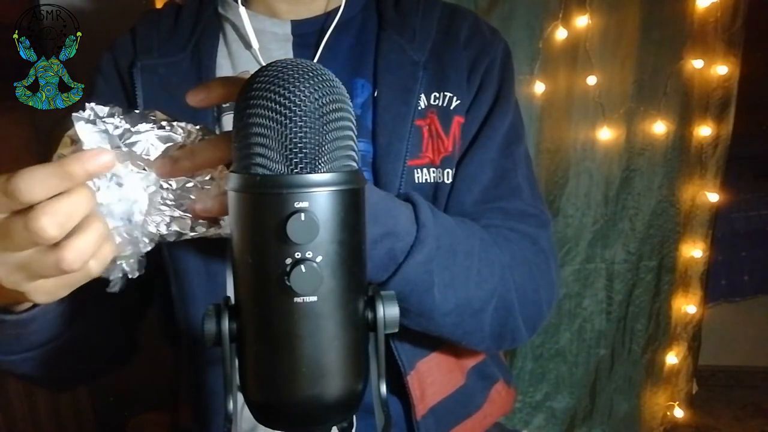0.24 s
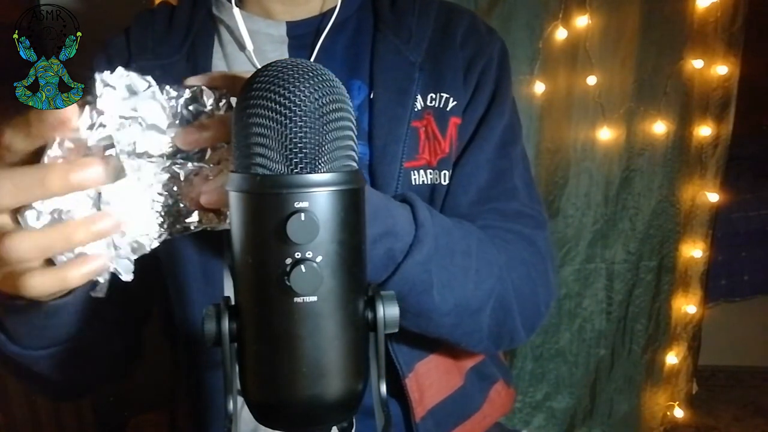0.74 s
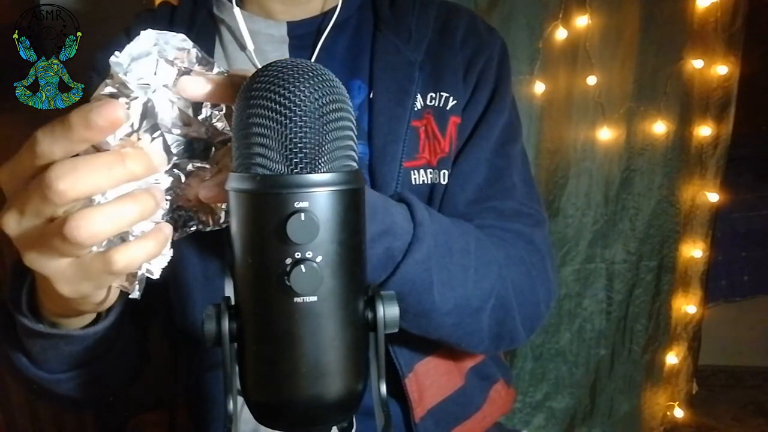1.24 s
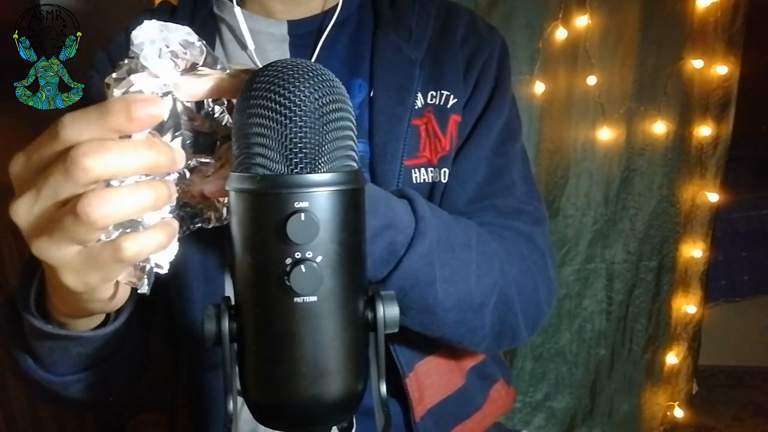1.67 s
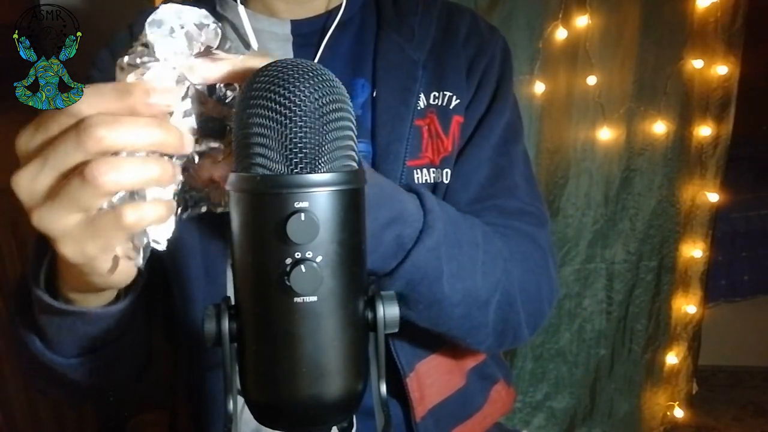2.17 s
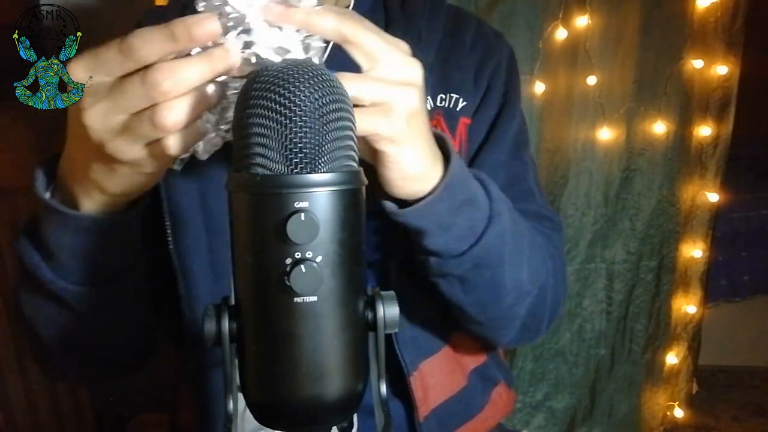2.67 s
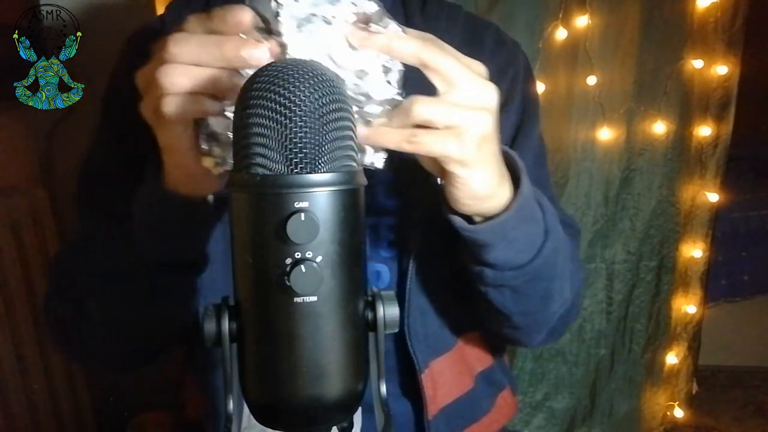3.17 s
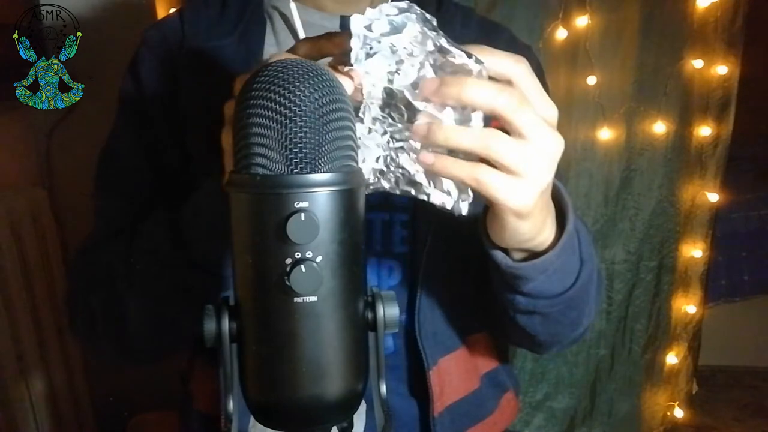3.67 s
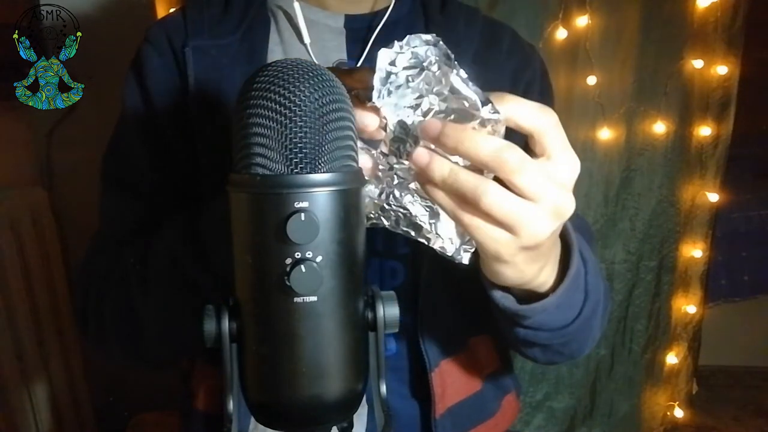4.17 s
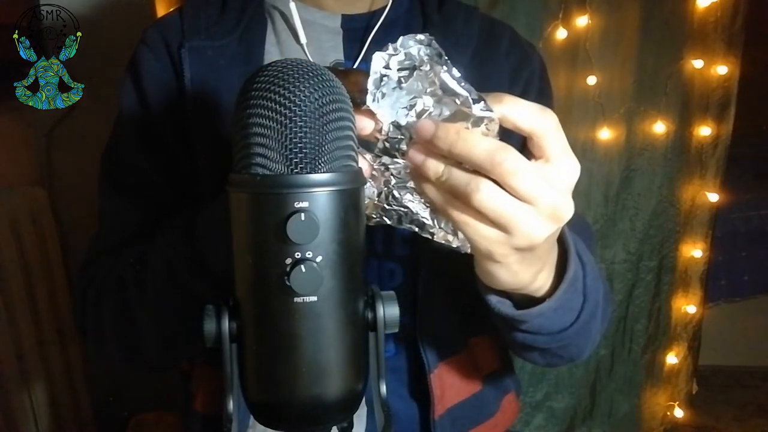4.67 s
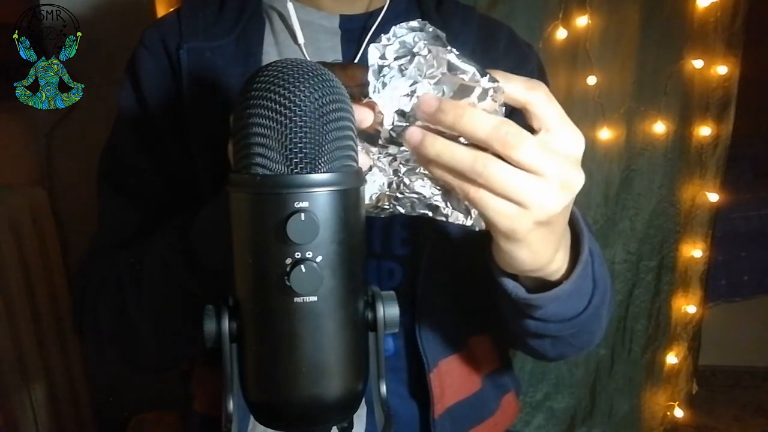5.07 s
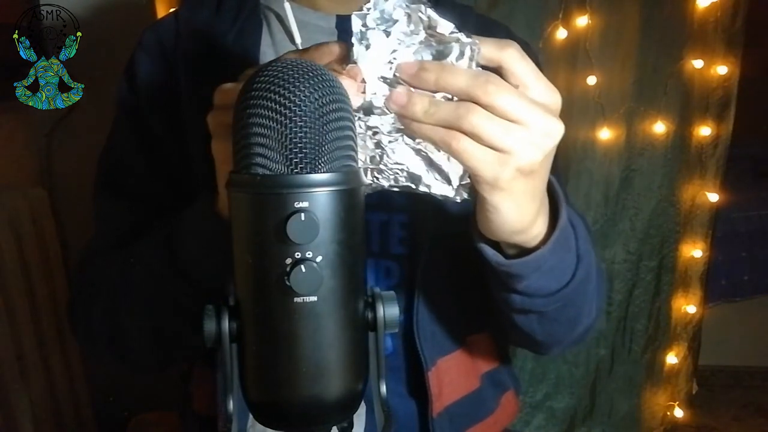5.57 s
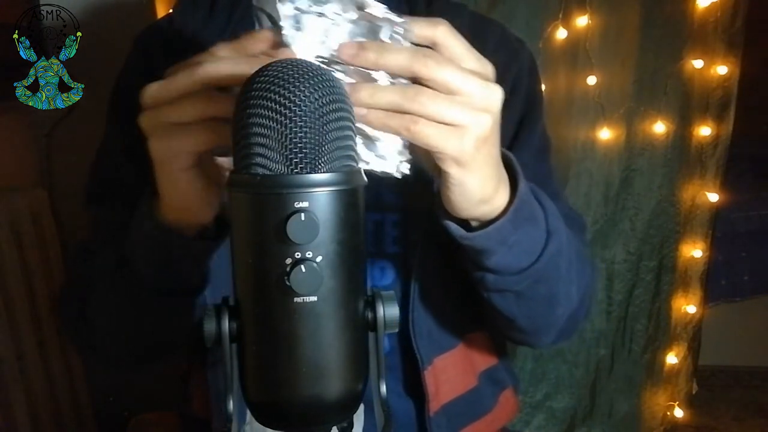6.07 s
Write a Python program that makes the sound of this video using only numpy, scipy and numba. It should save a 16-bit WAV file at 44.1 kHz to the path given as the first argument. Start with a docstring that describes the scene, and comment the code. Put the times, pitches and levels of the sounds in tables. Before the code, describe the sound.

Close, crisp crinkling of thin foil in irregular squeezes, busy at first, sparser and fainter around five seconds, then snapping again.

```python
"""Aluminium foil crumpled in both hands

Crumpled foil is squeezed beside a desk microphone in a quiet, damped room. Each crease that buckles ticks
and rings the small facets round it for a few milliseconds; countless faint creases crackle between the
loud ones. Large panels pop over with soft thuds, and the flexing sheet clicks dully and pushes low puffs
of air. A short hiss trails the snaps, over the faint noise of still air."""
import sys
import numpy as np
from scipy import signal
from scipy.fft import rfft, irfft, next_fast_len
from scipy.io import wavfile
from scipy.ndimage import uniform_filter1d
from numba import njit

SR = 44100
rng = np.random.default_rng(int(sys.argv[2]) if len(sys.argv) > 2 else 0)


def unload_audio(sound):
    """Save the sound as a 16-bit wav file, at the path given as the first command line argument."""
    columns = np.transpose(np.atleast_2d(sound))
    # keep every value between -1 and 1, then stretch to whole-number steps
    steps = np.round(np.clip(columns, -1, 1) * 32767)
    wavfile.write(sys.argv[1], SR, steps.astype(np.int16))


N = 279153


def undb(db):
    """Decibels to gain."""
    return 10 ** (np.asarray(db) / 20)


def level(x, db):
    """Scale to an rms level in dB."""
    return x * undb(db) / np.sqrt(np.mean(x ** 2))


def read(table, hz):
    """dB of a spectrum, straight lines on a log-frequency axis."""
    f, db = np.transpose(table)
    return np.interp(np.log(hz), np.log(f), db)


def noise(table):
    """Noise with the given spectrum, rms 1."""
    size = next_fast_len(N)
    hz = np.maximum(np.arange(size // 2 + 1) * SR / size, 1)
    spectrum = rfft(rng.standard_normal(size)) * undb(read(table, hz))
    return level(irfft(spectrum, size)[:N], 0)


def walk(rate):
    """Random levels, `rate` of them a second, joined by straight slopes."""
    k = int(SR / rate)
    held = np.repeat(rng.standard_normal(N // k + 1), k)
    return uniform_filter1d(held, k)[:N]


@njit
def add(out, start, pole, size, rise):
    """Damped rings, each swelling over a short rise and followed until it is 60 dB down."""
    for k in range(len(start)):
        z, gate = size[k], 1.
        length = int(-6.9 / np.log(abs(pole[k])))
        for i in range(start[k], min(start[k] + length, len(out))):
            gate *= rise[k]
            out[i] += z.imag * (1 - gate)
            z *= pole[k]


def rings(s, hz, t60, gain, rise_s):
    """Sum of decaying sine rings that start at times s with random phase."""
    s, hz, t60, gain, rise_s = (np.ravel(v) for v in np.broadcast_arrays(s, hz, t60, gain, rise_s))
    out = np.zeros(N)
    turn = 2j * np.pi * np.clip(hz, 20, .45 * SR)
    decay = np.log(1000) / np.clip(t60, 1e-3, 1)
    pole = np.exp((turn - decay) / SR)
    size = gain * np.exp(2j * np.pi * rng.random(len(s)))
    start = np.clip(s * SR, 0, N - 1).astype(np.int64)
    add(out, start, pole, size, np.exp(-1 / (rise_s * SR)))
    return out


def facets(s, db, focus_hz, lo_hz, hi_hz, count, spread_s, bend=1.):
    """A buckling crease rings `count` facets over a band; those near its own size most, late ones less."""
    # how readily the foil's facets ring: (f/Hz, level/dB)
    foil_response = [(130, -33), (220, -4.5), (990, -3.5), (1460, -1.5), (2500, -3), (5400, -3),
                     (9240, 0.5), (13900, 0), (17000, -2)]
    ring_s, ring_power = 0.0055, 0.31  # mean t60 of a 4 kHz facet; larger facets ring longer
    focus_db = 7.0  # fall per octave away from the size of the crease, down to a floor
    u = rng.random((len(s), count, 4))
    place = (np.arange(count) + u[..., 0]) / count
    hz = lo_hz + (hi_hz - lo_hz) * place ** bend
    late = -np.log(1 - u[..., 1])
    t60 = ring_s * (4000 / hz) ** ring_power * (.5 + u[..., 2])
    off_db = np.minimum(focus_db * np.abs(np.log2(hz / focus_hz[:, None])), 8.5)
    scatter_db = 6.8 * (u[..., 3] - .5)
    db = db[:, None] + read(foil_response, hz) - off_db - 3.54 * late + scatter_db
    return rings(s[:, None] + spread_s * late, hz, t60, undb(db) / np.sqrt(count), .0001)


def snaps():
    """Loud creases: a dry tick, then one facet stands out and its neighbours ring with it."""
    # buckling creases: (t/s, main facet level/dB, small facets level/dB, large facets level/dB,
    # main facet f/Hz); levels relative within each column
    creases = [(0.0164, -24, -27, -34, 2100), (0.0352, -17, -26, -39, 7000), (0.064, -14, -10, -9.5, 2530),
               (0.203, -20, -26, -31, 6960), (0.2485, -27, -29, -36, 1260), (0.251, -16, -30, -29, 4560),
               (0.2683, -18.5, -27, -44, 4500), (0.401, -19, -22, -22.5, 7600),
               (0.529, -36, -31, -20.5, 2620), (0.5855, -18, -28, -45, 12800),
               (0.6013, -12.5, -21, -45, 2830), (0.6562, -1, -18, -28, 12100),
               (0.6827, -12, -23, -28, 9040), (0.7236, -12, -14, -21, 7900), (0.752, -7, -25, -31, 11500),
               (0.7626, -5, -23, -30, 9200), (0.771, -3, -28, -34, 3120), (0.783, -7, -29, -42, 3000),
               (0.7964, -6.5, -31, -40, 2640), (0.8064, -20, -10, -36, 6330), (0.823, -10, -24, -27, 1700),
               (0.8564, -7.5, -36, -38, 2420), (0.8962, -21, -17, -25, 5000), (0.923, -2.5, -17, -25, 4570),
               (0.946, -11, -13.5, -31, 9200), (0.9516, -6, -16, -19, 2900), (0.9725, -9, -14, -45, 9130),
               (0.999, -20, -19, -36, 3500), (1.0273, -28, -21, -30, 890), (1.058, -21, -16, -26.5, 9700),
               (1.0785, -16, -25, -25.5, 2460), (1.1135, -14.5, -21, -21, 1080),
               (1.133, -21, -20, -31, 2780), (1.1744, -11, -16, -51, 3450), (1.189, -5, -11, -31, 9900),
               (1.246, -10, -38, -39, 3300), (1.251, -11, -22, -24, 8200), (1.2716, -8, -23, -39, 13820),
               (1.303, -6, -22, -27, 9500), (1.3637, -13, -10, -30, 10100), (1.392, -8, -16, -30, 9500),
               (1.408, -10, -13, -59, 2700), (1.4507, -8, -24, -42, 9000), (1.4774, -12, -10, -25.5, 10550),
               (1.546, -7, -13, -24, 9220), (1.5551, -13, -21, -46, 10290), (1.577, -9, -14, -25, 3370),
               (1.6014, -9.5, -13, -28, 2930), (1.635, -14, -12.5, -43, 7200),
               (1.6735, -12, -12, -28, 7600), (1.69, -8, -20, -32.5, 11300), (1.7125, -6, -19, -25, 10900),
               (1.7277, -10, -10.5, -40, 3240), (1.809, -9, -14.5, -25, 10700),
               (1.8504, 2, -8.5, -47, 14300), (1.861, -6.5, -22, -36, 6440),
               (1.8796, -16, -20, -30.5, 11000), (1.934, -24, -28, -50, 11200),
               (1.9762, -10, -10.5, -23.5, 8930), (2.008, -11, -21, -54, 6600),
               (2.053, -17, -32, -38, 5500), (2.0558, -16, -30, -29, 2540), (2.0765, -22, -40, -26, 1500),
               (2.093, -25, -32, -23, 1970), (2.0976, -10, -17, -23, 14000), (2.102, -21, -19, -23, 5000),
               (2.115, -20, -22, -28, 10500), (2.133, -5, -17, -25, 11900), (2.1494, -22, -15, -17, 3340),
               (2.1992, -12, -20, -19, 2800), (2.206, -8, -8.5, -11.5, 4960), (2.2213, -18, -20, -16, 2000),
               (2.2357, -9, -12.5, -41, 4060), (2.2625, -25, -19, -39, 6000), (2.2758, -26, -29, -29, 3000),
               (2.2999, -25, -41, -23.5, 3660), (2.3334, -15, -30, -29, 4000), (2.338, -15, -20, -17, 8550),
               (2.356, -6.5, -8.5, -15.5, 3600), (2.3896, 2, -6, -33, 3640), (2.434, -8, -40, -50, 11000),
               (2.483, -14, -23, -15, 2450), (2.5042, -30, -34, -33, 2550), (2.5485, -12, -19, -46, 7300),
               (2.552, -15, -14.5, -25, 1480), (2.5722, -8, -20, -22, 7900), (2.5862, -8, -29, -19, 2280),
               (2.6256, -17, -32, -32, 7050), (2.6412, -4.5, -6.5, -20, 1890), (2.661, -23, -17, -28, 9500),
               (2.699, -13, -20, -40, 2490), (2.7053, -19, -18, -33, 9300), (2.7275, -13, -20, -27, 9650),
               (2.735, -15, -16, -33, 8200), (2.748, -23, -9.5, -22, 8140), (2.7976, -3, -16, -33, 11600),
               (2.832, -17, -12, -27, 10000), (2.8476, -9, -13, -27, 7660), (2.8578, -12, -13, -28, 13050),
               (2.9185, -13, -22, -44, 9100), (2.928, -12, -10, -23, 9100), (2.9428, -10, -9, -14, 6900),
               (2.959, -18, -22, -26, 5990), (3.0333, -24, -18.5, -34, 7000), (3.0997, -13, -19, -36, 2270),
               (3.12, -9, -14, -26, 10550), (3.128, -10, -24, -32, 5540), (3.142, -11, -32, -30, 5200),
               (3.196, -10, -22, -26, 7550), (3.205, -4.5, -11, -33, 9300), (3.212, -7, -22, -36, 9600),
               (3.24, -20, -24, -34, 8000), (3.3197, -17, -41, -47, 8140), (3.3514, -22, -20, -33, 10680),
               (3.3792, -31, -32, -30, 1300), (3.403, -14, -27, -45, 11700),
               (3.4165, -30, -15.5, -22.5, 1100), (3.475, -15, -18, -42, 7000),
               (3.4823, -24, -41, -21, 1190), (3.515, -19, -25, -35, 9500), (3.5453, -10, -26, -44, 9950),
               (3.592, -21, -19, -19.5, 1510), (3.6385, -19, -17.5, -33.5, 6760),
               (3.69, -3.5, -17, -23, 9150), (3.726, -18, -12, -19.5, 9000), (3.737, -10, -23, -28, 8100),
               (3.7698, -12, -20, -26.5, 8900), (3.7972, 1, -3, -23.5, 8830), (3.8415, -15, -18, -29, 7200),
               (3.8568, -4, -15, -37, 9050), (3.9841, -29, -25, -20.5, 2650), (4.034, -12, -22, -40, 9170),
               (4.075, -5, -16, -28.5, 14400), (4.1155, -11, -14.5, -22.5, 8900),
               (4.1512, -9, -36, -22, 8300), (4.1987, -12, -25, -20.5, 9700), (4.247, -13, -22, -31, 9170),
               (4.319, -32, -29.5, -43, 9600), (4.466, -18, -22, -38, 3100), (4.4732, -33, -22, -34, 11700),
               (4.5096, -19, -21, -28, 1420), (4.5402, -12, -17.5, -39, 10800),
               (4.558, -30, -30, -47, 7000), (4.5673, -18, -18, -29, 2050), (4.5895, -29, -36, -41, 2500),
               (4.605, -27, -24, -34, 1800), (4.643, -37, -33, -31.5, 5000), (4.6698, -29, -37, -38, 2200),
               (4.7175, -27, -51, -57, 8910), (4.8393, -22, -35, -40, 9050), (4.86, -30, -40, -40, 3500),
               (4.948, -19, -36, -42, 9400), (4.9772, -21, -28, -28.5, 8440), (5.086, -22, -39, -60, 10200),
               (5.111, -28, -27.5, -53, 12500), (5.127, -30, -35, -46, 13100),
               (5.1523, -27, -36, -58, 10500), (5.176, -8, -16, -44, 5860), (5.256, -26, -30, -44, 11180),
               (5.306, -22, -30, -50, 9750), (5.3558, -19, -29, -44, 10720),
               (5.3702, -11, -10, -25.5, 8700), (5.42, -7, -24, -30, 6460), (5.425, -7, -16, -44, 9200),
               (5.4333, -18, -6, -32, 12600), (5.443, -7, -23, -48, 8500), (5.551, -12, -22, -52, 9260),
               (5.5724, -14.5, -16, -29, 2600), (5.595, -13, -16, -31, 8200), (5.611, -14, -20, -40, 8100),
               (5.644, -32, -15, -30.5, 12000), (5.7415, -27, -58, -45, 1420),
               (5.757, -18.5, -28, -35, 7550), (5.7717, -28, -20.5, -35, 12800),
               (5.7945, -16, -29, -25, 1230), (5.8083, -29, -24, -41, 3000), (5.833, -10, -19, -46, 9100),
               (5.843, -27, -13.5, -30, 6500), (5.855, -19, -35, -29, 2200),
               (5.9018, -17, -19, -23.5, 9400), (5.9502, -22, -30, -37, 2950),
               (5.9746, -11, -21.5, -25.5, 7060), (6.0159, -20, -29, -28.5, 8100),
               (6.039, -20, -31, -34, 9870), (6.0764, -26, -33, -49, 6370), (6.0917, -24, -17.5, -30, 6860),
               (6.0944, -19, -20, -32, 4500), (6.102, -20, -27, -32, 4020), (6.2053, -5, -17, -24.5, 12000),
               (6.2158, -16, -22, -33, 7540), (6.2879, -2, -9, -19, 7300), (6.2961, -11, -13.5, -23, 11760),
               (6.3072, -21, -36, -36, 8200)]
    snap_s, snap_power, tick_hz = 0.0036, 0.12, 3450  # t60 of a 4 kHz main facet, its slope with size
    s, main_db, small_db, large_db, hz = np.transpose(creases)
    main = rings(s + .0002, hz, snap_s * (4000 / hz) ** snap_power, undb(main_db), 0.000085)
    tick = rings(s, tick_hz, 0.00093, undb((small_db + large_db) / 2 + 11.0), .00003)
    large = facets(s, large_db + 14.0, np.minimum(hz, 2800), 215, 4120,
                   count=12, spread_s=.0003, bend=1.303)
    small = facets(s, small_db + 12.0, np.maximum(hz, 6000), 4220, 17150, count=22, spread_s=0.00035)
    return tick + main + large + small


def squeeze_db(t):
    """Crackle strength of small and large facets: every squeeze grips, holds, lets go and settles."""
    # squeezes of the fingers: (t/s, length/s, level at start/dB, level at end/dB,
    # large facets over small ones level/dB)
    squeezes = [(0, 0.067, -35, -43, 4.5), (0.079, 0.045, -37, -32.5, 2.5), (0.155, 0.053, -40, -38, -0.5),
                (0.242, 0.044, -34.5, -37, -0.5), (0.318, 0.13, -35.5, -35, 2.5),
                (0.475, 0.056, -38, -32.5, 1), (0.573, 0.059, -36.5, -39.5, -7),
                (0.656, .035, -38, -34, -0.5), (0.707, 0.13, -28.5, -31, 1), (0.853, 0.034, -34, -34, -2.5),
                (0.923, 0.09, -25.5, -39.5, -0.5), (1.054, 0.11, -37.5, -35, -0.5),
                (1.183, 0.15, -31.5, -30, -0.5), (1.345, 0.049, -46, -35, 2.5),
                (1.438, 0.18, -35.5, -31.5, -1), (1.659, 0.19, -38, -33.5, -2.5),
                (1.973, 0.062, -44, -44.5, -8), (2.047, 0.19, -40.5, -38, 4.5),
                (2.307, 0.11, -37, -36.5, 1), (2.461, 0.29, -36, -34.5, -0.5),
                (2.781, 0.16, -33, -32.5, -3), (2.996, 0.033, -49, -42, 0.5),
                (3.079, 0.13, -33.5, -34.5, -3.5), (3.257, 0.014, -35, -45.5, -5.5),
                (3.321, 0.348, -38.5, -43.5, -4.5), (3.705, 0.19, -37, -31.5, -4),
                (3.934, 0.29, -35, -35.5, -3), (4.457, 0.2, -48, -45, -0.5), (4.81, 0.16, -55, -55, 4.5),
                (5.061, 0.2, -67, -45, -2), (5.332, 0.051, -42, -46, -4), (5.42, 0.21, -30.5, -40.5, -6.5),
                (5.776, 0.13, -43.5, -42, -3), (5.89, 0.22, -54, -42, -2), (6.166, 0.026, -46, -41, -5),
                (6.31, 0.013, -47, -50, -4)]
    grip_s, let_go_s = 0.013, 0.028  # e-fold times of the rise before and the fall after the hold
    settle_db, settle_s = -9.5, 0.029  # fainter crackle under the hold, and its e-fold time once let go
    creep_db = -56.5  # the foil still settles between squeezes
    power = undb(2 * creep_db) + np.zeros((2, len(t)))
    for s, length, first_db, last_db, large_db in squeezes:
        left = s + length - t
        held_db = np.interp(t, [s, s + length], [first_db, last_db])
        edge = np.minimum(np.minimum((t - s) / grip_s, left / let_go_s), 0)
        settle = undb(2 * settle_db) * (t > s) * np.exp(2 * np.minimum(left / settle_s, 0))
        small = undb(2 * held_db) * (np.exp(2 * edge) + settle)
        power = power + small * np.array([[1], [undb(2 * large_db)]])
    return 10 * np.log10(power)


def crackle(lo_hz, hi_hz, per_s, scatter_db, count):
    """Random faint creases, each of its own size and with a long-tailed spread of strengths, rms 1."""
    u = rng.random((int(per_s * N / SR), 3))
    db = np.minimum(-scatter_db * np.log(1 - u[:, 1]), 14.)
    # the fold under the fingers sets the size for a while
    fold = .5 + .3 * walk(9)[(u[:, 0] * N).astype(int)]
    size = np.clip(.6 * fold + .4 * u[:, 2], 0, 1)
    focus_hz = lo_hz * (hi_hz / lo_hz) ** size
    return level(facets(u[:, 0] * N / SR, db, focus_hz, lo_hz, hi_hz, count=count, spread_s=.0002), 0)


def small_crackle(small_db, burst_db):
    """Small creases tick while crumpled layers scrape; a light grip ticks, a firm one scrapes."""
    ticks = crackle(2310, 17000, 500., 8.7, count=12)
    rustle = crackle(3310, 17230, 5200., 3.7, count=3)
    scrape_db = -5.5 + 0.28 * (small_db + 36)
    return undb(small_db + burst_db) * (undb(-0.5) * ticks + undb(scrape_db) * rustle)


def large_crackle(large_db, burst_db):
    """Larger facets buckle lower in pitch and follow the avalanches less."""
    return undb(large_db + 0.51 * burst_db - 4.5) * crackle(1120, 4110, 850., 4.5, count=4)


def pops():
    """Large panels flip with a soft thud of a few quickly dying cycles, in three partials."""
    # panels popping over: (t/s, level/dB, f/Hz)
    panel_pops = [(0.064, -24, 300), (0.528, -28.5, 142), (0.89, -26.5, 258), (1.112, -25, 517),
                  (2.107, -24.5, 187), (2.133, -20, 550), (2.152, -22, 503), (2.181, -31, 186),
                  (2.207, -23, 536), (2.229, -29.5, 120), (2.248, -30, 431), (2.301, -21, 443),
                  (2.317, -24, 814), (2.341, -20.5, 427), (2.365, -29, 123), (2.377, -27, 500),
                  (2.392, -15.5, 596), (2.396, -21, 114), (2.414, -41, 151), (2.637, -29, 406),
                  (2.848, -34, 264), (2.904, -30, 170), (2.949, -21, 158), (3.094, -27.5, 362),
                  (3.199, -32, 221), (3.241, -21.5, 186), (3.259, -29, 400), (3.414, -26, 183),
                  (3.593, -38, 201), (3.856, -27.5, 258), (3.893, -20, 383), (4.248, -31, 375),
                  (4.475, -30.5, 234), (4.516, -31, 70), (4.569, -31, 180), (4.606, -24, 454),
                  (4.609, -22.5, 120), (4.618, -32, 65), (4.646, -27, 167), (4.657, -36, 60),
                  (4.69, -32, 130), (4.745, -35, 150), (4.823, -30.5, 330), (4.831, -35, 161),
                  (4.972, -35, 114), (5.795, -30, 695), (5.815, -38, 42), (5.869, -29, 163),
                  (5.953, -38, 52.4), (6.02, -28.5, 360), (6.039, -34, 181), (6.095, -35, 70),
                  (6.161, -30.5, 228)]
    s, db, hz = np.transpose(panel_pops)
    hz = hz[:, None] * np.array([.62, 1, 1.7])
    s = s[:, None] - .0018  # starts early, as the thud swells to its peak
    return rings(s, hz, 6.3 / hz, undb(db[:, None] + np.array([-5.0, 2.5, -3.0])), 0.4 / hz)


def bending_db(t, small_db, burst_db):
    """Strength of the sheet's bending: a slow course, raised by the grip and jolted in bumps."""
    # slow course of the flexing sheet: (t/s, level/dB)
    fold_course = [(0.0, -49), (0.32, -57), (0.6, -52), (1.69, -62.5), (1.87, -70), (2.06, -52),
                   (2.24, -49.5), (2.57, -54.5), (2.73, -44), (4.05, -51), (4.27, -55.5), (4.49, -57.5),
                   (4.71, -49.5), (5.04, -56), (5.24, -54.5), (5.38, -65), (5.82, -52.5), (6.03, -49),
                   (6.22, -49.5), (6.33, -51)]
    slack_db = np.interp(t, *np.transpose(fold_course))
    grip_db = small_db - uniform_filter1d(small_db, SR // 2)
    flex_db = slack_db + 0.65 * grip_db + 4.5
    return flex_db + .6 * burst_db + 3.0 * walk(16)


def panel_clicks(bump_db, large_db):
    """Whole panels click dully when the sheet flexes."""
    return undb((bump_db + large_db) / 2 - 8.0) * crackle(217, 1210, 250., 5.3, count=3)


def air_puffs(bump_db):
    """The flexing sheet pushes low air noise in bumps."""
    # spectrum of the pushed air: (f/Hz, level/dB per Hz), relative
    flex_spectrum = [(12, -27), (20, 8.5), (163, 5), (304, -3), (358, -0.5), (700, -14.5), (910, -60)]
    return undb(bump_db - 5.0) * noise(flex_spectrum)


def after_rattle(x):
    """The shaken sheet and soft room sound on as a fading hiss that keeps the colour of each snap."""
    # bands of the tail: (low edge f/Hz, high edge f/Hz, t60/s, level/dB)
    rattle_bands = [(497, 2760, 0.047, -8.5), (1960, 4630, 0.025, -5), (4940, 12200, 0.027, -5.5),
                    (9600, 19600, 0.007, -8)]
    out = 0
    for lo_hz, hi_hz, t60, db in rattle_bands:
        edges = np.geomspace(lo_hz, min(hi_hz, .45 * SR), 3)  # two strips to a band
        keep = 1e-6 ** (1 / (t60 * SR))  # energy kept per sample
        for strip in zip(edges, edges[1:]):
            band = signal.butter(2, strip, "bandpass", fs=SR, output="sos")
            stored = signal.lfilter([1 - keep], [1, -keep], signal.sosfilt(band, x) ** 2)
            hiss = level(signal.sosfilt(band, rng.standard_normal(N)), 0)
            out = out + undb(db) * np.sqrt(stored) * hiss
    return out


def still_air():
    """Steady faint noise of the quiet room."""
    # spectrum of the background: (f/Hz, level/dB per Hz), relative
    air_spectrum = [(15, -30), (25, 0), (1330, -5), (6210, -7), (9320, -6), (16000, -15)]
    return undb(-66) * noise(air_spectrum)


def scene():
    """Snaps, crackle, pops and flexing, their tail, and still air."""
    t = np.arange(N) / SR
    small_db, large_db = squeeze_db(t)
    burst_db = 1.92 * walk(45)  # creases give way in avalanches
    bump_db = bending_db(t, small_db, burst_db)
    foil = snaps() + small_crackle(small_db, burst_db) + large_crackle(large_db, burst_db)
    foil = foil + pops() + panel_clicks(bump_db, large_db)
    return (foil + after_rattle(foil) + air_puffs(bump_db) + still_air())[None]


def record(dry):
    """Rounds the sharpest peaks, then a steep low-pass at top_hz."""
    top_hz, drive = 15900, 3.2  # peaks level off towards 1 / drive
    rounded = np.tanh(drive * dry) / drive
    return signal.sosfilt(signal.ellip(10, .2, 60, top_hz, fs=SR, output="sos"), rounded)


dry = scene()
out = record(dry)
unload_audio(out)
```